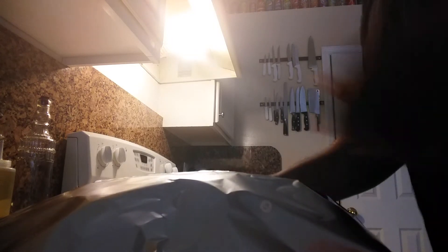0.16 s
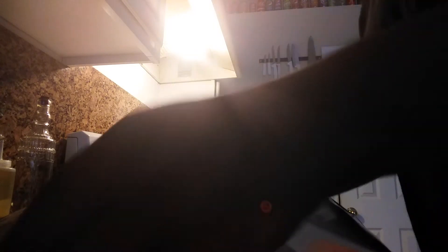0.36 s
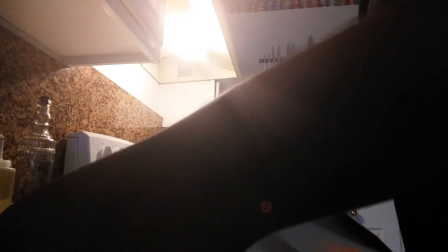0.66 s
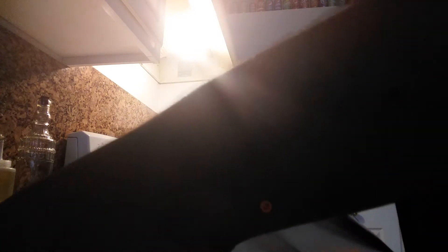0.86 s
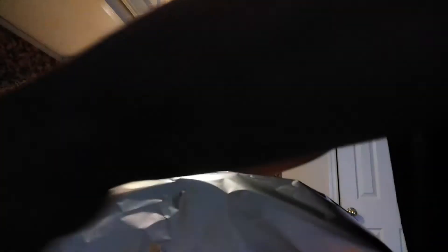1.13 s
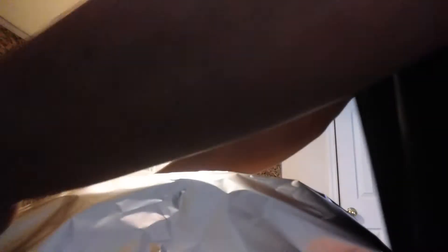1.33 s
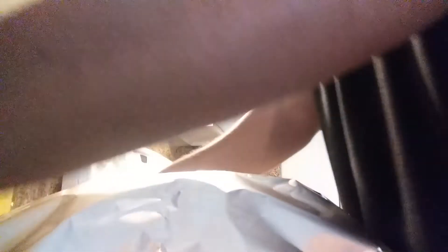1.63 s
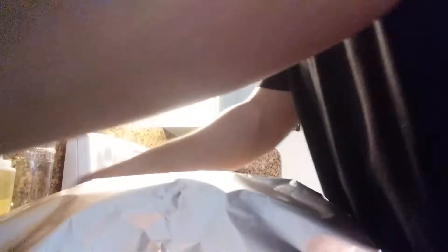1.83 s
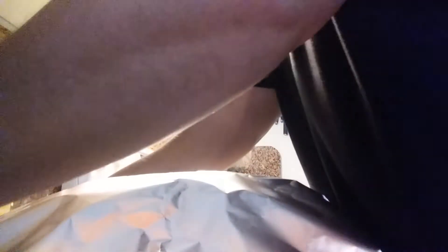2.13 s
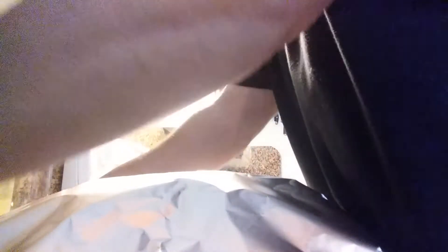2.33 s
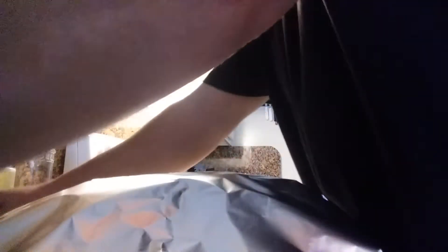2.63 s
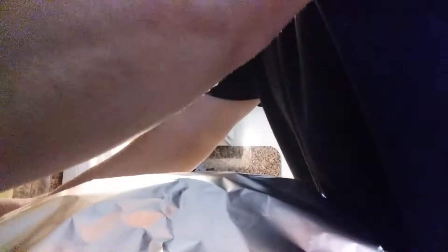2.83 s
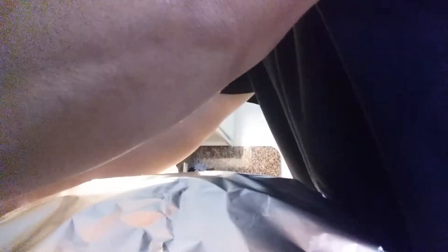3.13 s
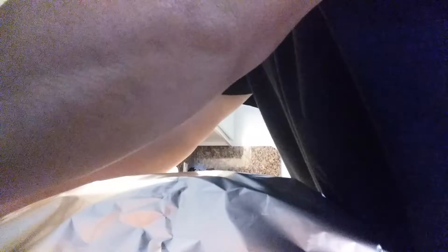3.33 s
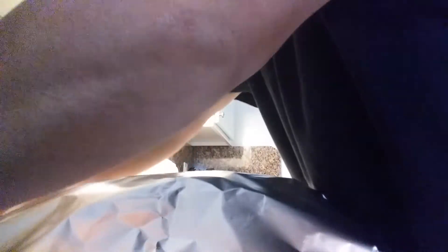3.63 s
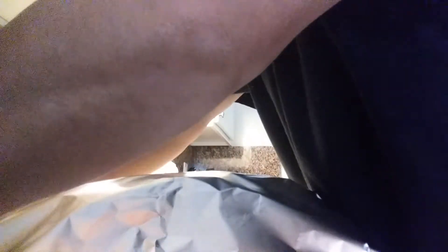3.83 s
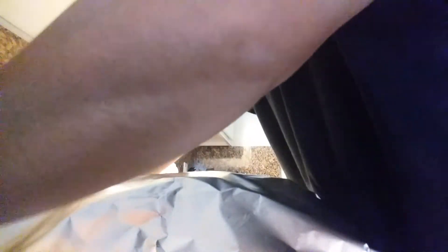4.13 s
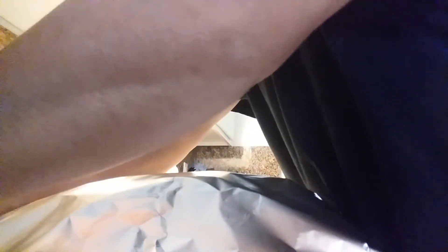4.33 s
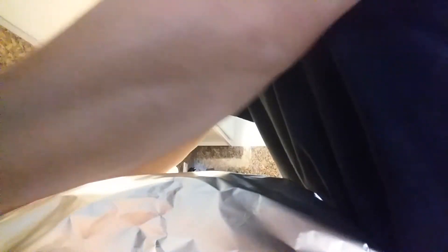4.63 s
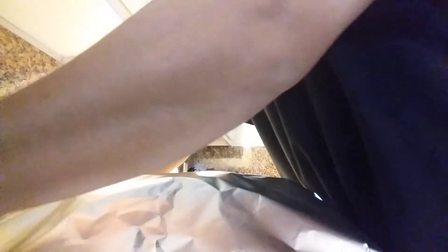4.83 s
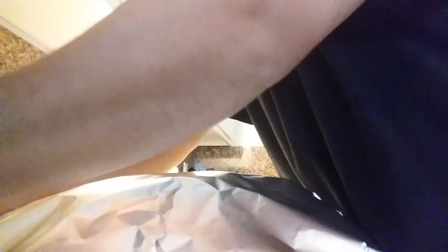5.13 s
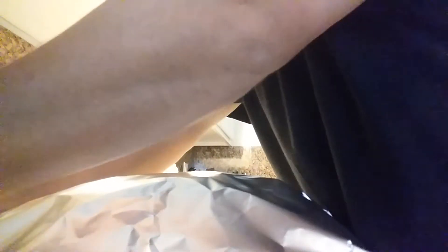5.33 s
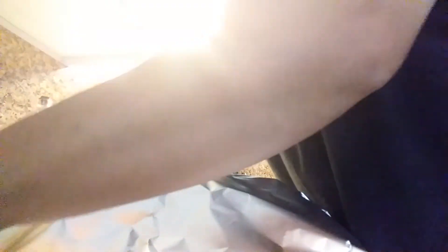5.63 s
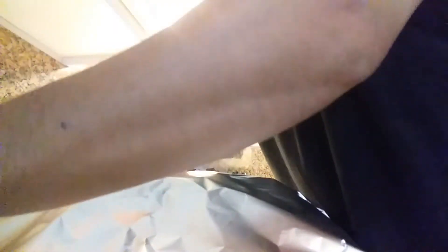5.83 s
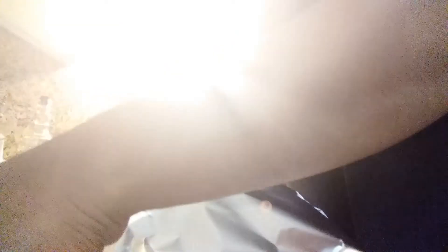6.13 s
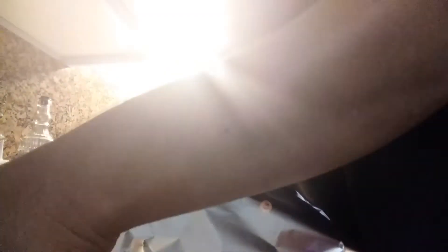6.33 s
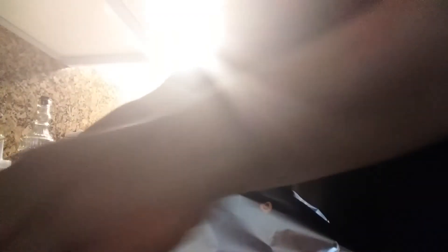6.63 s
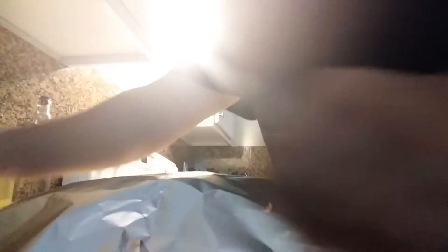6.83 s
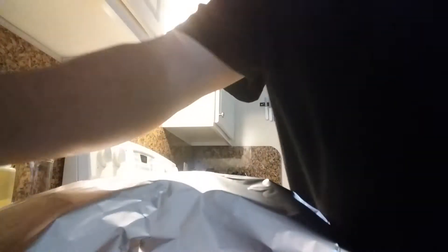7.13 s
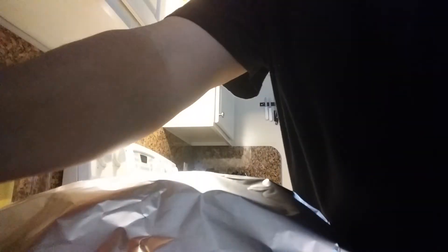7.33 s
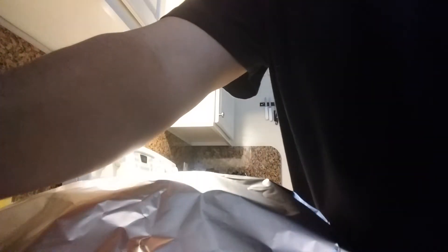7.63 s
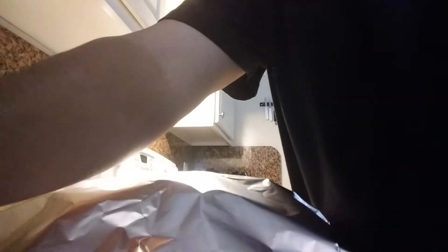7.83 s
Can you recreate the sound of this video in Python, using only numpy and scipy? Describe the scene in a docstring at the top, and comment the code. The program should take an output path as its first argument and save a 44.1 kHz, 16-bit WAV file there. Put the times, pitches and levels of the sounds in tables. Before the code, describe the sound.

Close, busy crumpling of kitchen foil, with sharp creases, fine crackle and sliding rustle, fading after seven seconds to near silence with soft knocks.

```python
"""Hands press and fold aluminium foil over a pan, close to a single microphone in a small kitchen.
From the start, creases snap through one by one as bursts of noise that shake the sheet's dense modes; between
them small creases crackle over the rustle of sliding foil, filtered noise that sings on a few notes. The pan
rings along as a bank of resonances. Tiny kinks tick and short rough notes sound until the work fades. Dull
thuds, low modes driven by noise, jolt under early creases and return at the end. A faint hum runs throughout."""
import sys
import numpy as np
from scipy import signal
from scipy.fft import rfft, irfft, next_fast_len
from scipy.io import wavfile

SR = 44100
rng = np.random.default_rng(int(sys.argv[2]) if len(sys.argv) > 2 else 0)


def file_out(sig):
    """Save sig as 16-bit WAV at sys.argv[1]."""
    # one column per channel
    cols = np.atleast_2d(sig).T
    # limit, then scale
    lim = np.clip(cols, -1, 1)
    pcm = np.round(lim * 32767).astype(np.int16)
    wavfile.write(sys.argv[1], SR, pcm)


N = 351477
GRAIN = 4096   # unit of crease length [samples]
BASS_HZ, MIDDLE_HZ, TREBLE_HZ = 401, 2986, 11900   # where the colour weights act


def from_db(db):
    """Decibel definition: amplitude ratio of a level."""
    return 10 ** (np.asarray(db) / 20)


def rms_one(x):
    """Normalisation to unit effective value."""
    return x / np.sqrt(np.mean(x ** 2) + 1e-20)


def at_hz(points, hz):
    """Interpolation of a (frequency [Hz], value) table on a logarithmic frequency axis."""
    table_hz, values = np.array(points).T
    return np.interp(np.log(hz + 1), np.log(table_hz), values)


def colour(x, spectrum):
    """Linear filtering: the spectrum of the last axis is multiplied by a gain curve."""
    size = x.shape[-1]
    gain = from_db(at_hz(spectrum, np.fft.rfftfreq(size, 1 / SR)))
    return irfft(rfft(x) * gain, size)


def three_ways(x):
    """Complementary band splitting: bass, middle and treble shares add up to the whole."""
    size = x.shape[-1]
    hz = np.fft.rfftfreq(size, 1 / SR)
    shares = [at_hz(np.c_[[BASS_HZ, MIDDLE_HZ, TREBLE_HZ], row], hz) for row in np.eye(3)]
    return [irfft(rfft(x) * share, size) for share in shares]


def drift(rate_hz):
    """Low-pass filtered noise: slow chance with spread 1."""
    r = np.exp(-2 * np.pi * rate_hz / SR)
    slow = signal.lfilter([1], [1, -2 * r, r * r], rng.standard_normal(N + SR))
    return rms_one(slow[SR:])   # the filter has settled after one second


def resonate(x, hz, width_hz):
    """Simple resonance: a two-pole filter with gain 1 on top."""
    r = np.exp(-np.pi * width_hz / SR)
    poles = [1, -2 * r * np.cos(2 * np.pi * hz / SR), r * r]
    return signal.lfilter([(1 - r * r) / 2, 0, (r * r - 1) / 2], poles, x)


def hum():
    """Narrow-band noise wavers in level: a faint low hum, probably an appliance."""
    narrow = resonate(rng.standard_normal(N), 123, 36)
    return from_db(-67.5) * rms_one(resonate(narrow, 123, 90))


# decay times of the room's bass, middle and treble: (t60 [s])
ROOM_DECAY = [0.21, 0.19, 0.098]


def kitchen(x):
    """Diffuse reverberation: convolution with noise that builds up softly and whose bass dies slowest."""
    t = np.arange(SR // 2) / SR
    parts = three_ways(rng.standard_normal(len(t)))
    tail = sum(part * from_db(-60 * t / t60) for part, t60 in zip(parts, ROOM_DECAY))
    tail *= 1 - np.exp(-t / 0.024)
    return signal.fftconvolve(x, tail / np.linalg.norm(tail))[:N]


# dull low thuds, at first bass jolts under loud creases, later soft knocks or a step:
# (time [s], relative level [dB], extra share of all modes but the lowest [dB])
THUD_TIMES = [(0.38, -29, -17), (1.69, -39, -17), (1.741, -34, -17), (7.464, -37, -17), (7.496, -38, -2),
              (7.522, -41, 8), (7.535, -46, 6.5), (7.557, -51, 9), (7.578, -45, 3), (7.721, -55, 6),
              (7.875, -59, 10)]
# low modes that every thud excites: (frequency [Hz], relative level [dB], t60 [s])
LOW_MODES = [(115, 5.5, 0.035), (328, -13, 0.065), (556, -17, 0.099), (740, -1, 0.028), (815, -5.5, 0.033),
             (1360, -8.5, 0.017)]


def thuds():
    """Modal excitation: short bursts of noise set the same low modes ringing."""
    s, level_db, high_db = np.transpose(THUD_TIMES)
    size = SR // 20
    burst = np.hanning(size) ** .5 * np.exp(-np.arange(size) / (0.021 * SR))
    out = np.zeros(N)
    for k, (hz, mode_db, t60) in enumerate(LOW_MODES):
        push = np.zeros(N)
        push[(s * SR).astype(int)] = from_db(level_db + mode_db - 22 + (k > 0) * high_db)
        push = signal.fftconvolve(push, burst)[:N] * rng.standard_normal(N)
        r, w = from_db(-60 / (t60 * SR)), 2 * np.pi * hz / SR
        out += signal.lfilter([0, np.sin(w)], [1, -2 * r * np.cos(w), r * r], push)
    # little deep bass
    return signal.sosfilt(signal.butter(2, 75, "high", fs=SR, output="sos"), out)


STIR_DB, STIR_BEFORE_S, STIR_AFTER_S = -19.5, 0.045, 0.068   # amplitude time constants


def stir():
    """Exponential growth and decay: power of the unrest before and after each loud crease."""
    s, level_db = np.transpose(LOUD_CREASES)[:2]
    kicks = np.full(N, 1e-18)
    kicks[(s * SR).astype(int)] = from_db(2 * (level_db + STIR_DB))
    before, after = np.exp(-2 / (SR * np.array([STIR_BEFORE_S, STIR_AFTER_S])))
    outlasting = signal.lfilter([1], [1, -after], kicks)
    leading_up = signal.lfilter([0, before], [1, -before], kicks[::-1])[::-1]
    return outlasting + leading_up


# slow course of the hands' work: (time [s], relative level [dB])
HAND_WORK = [(0.02, -70), (0.05, -31.5), (0.36, -42.5), (0.45, -29.5), (1.1, -36.5), (1.4, -33),
             (1.82, -39.5), (2.31, -36), (2.7, -29), (2.93, -45), (3.69, -44.5), (4.05, -41), (4.3, -48),
             (4.67, -38.5), (5.1, -43.5), (5.86, -37.5), (5.94, -46), (6.5, -35), (6.875, -51),
             (6.885, -39.5), (7.17, -40.5), (7.42, -51.5), (7.46, -56.5), (7.57, -48.5), (7.69, -59.5),
             (7.76, -61), (7.8, -68), (7.97, -71.5)]
# manner of handling: (time [s], bass weight [dB], strength of the crackle over the rustle [dB])
HANDLING = [(0, 6.5, 3), (0.5, 5.5, -10), (1.4, 5.5, -1.5), (1.75, 5.5, -0.5), (2.399, 3, -5.5),
            (3.2, 4.5, 2), (4.9, 4, 0.5), (5.499, 10, 3.5), (6.2, 7, -5.5), (6.8, 11.5, 3), (6.9, 6, -6.5),
            (7.97, 4, -9)]


def at_time(s):
    """Addition of powers, slow work plus stir: level, bass weight and crackle strength at given times."""
    work_s, work_db = np.transpose(HAND_WORK)
    manner_s, bass_db, strength_db = np.transpose(HANDLING)
    work_power = from_db(2 * np.interp(s, work_s, work_db))
    level_db = 10 * np.log10(work_power + stir()[(s * SR).astype(int)])
    return level_db, np.interp(s, manner_s, bass_db), np.interp(s, manner_s, strength_db)


# spectrum of foil, pan and microphone together: (frequency [Hz], relative spectral density [dB per Hz])
SHEET_SPECTRUM = [(24, -48.5), (40, -27.5), (69, -10), (262, -14.5), (570, -7.5), (918, -3), (1410, -3.5),
                  (1590, -7), (3380, -2), (8130, -8), (9220, -6.5), (11300, -17.5), (14800, -15),
                  (16000, -11)]


def rustle():
    """Friction noise: foil slides under the palms, the less steady the stronger the crackle."""
    level_db, bass_db, strength_db = at_time(np.arange(N) / SR)
    noise = rms_one(colour(rng.standard_normal(next_fast_len(N)), SHEET_SPECTRUM))
    bass, middle, treble = (part[:N] for part in three_ways(noise))
    unsteady_db = 2.6 * from_db(strength_db) * drift(23)
    return from_db(level_db - 7.5 + unsteady_db) * (from_db(bass_db) * bass + middle + treble)


# notes of the taut foil: (frequency [Hz])
SINGING_NOTES = [570, 1010, 1320, 1970, 6600, 7150]
SINGING_WIDTH_SHARE = 0.031   # bandwidth as a share of the frequency


def singing(sliding):
    """Resonance under friction: taut foil sings on a few notes, clearer where the crackle is weaker."""
    strength_db = at_time(np.arange(N) / SR)[2]
    smooth = from_db(-9.5 - 1.1 * strength_db) * sliding
    return sum(resonate(smooth, hz, SINGING_WIDTH_SHARE * hz) for hz in SINGING_NOTES)


# resonances of the covered pan: (frequency [Hz], width [Hz], gain [dB])
PAN_MODES = [(209, 27, -6), (334, 42, -5), (573, 120, -5.5), (1425, 140, -8.5), (1850, 310, -9)]


def pan(foil):
    """Sympathetic resonance: the covered pan rings along with the foil."""
    return sum(from_db(gain_db) * resonate(foil, hz, width_hz) for hz, width_hz, gain_db in PAN_MODES)


# short rough notes, the two low ones near 4.5 s from a rub: (time [s], relative level [dB], frequency [Hz])
ROUGH_NOTES = [(0.509, -19, 1440), (0.609, -15, 1640), (0.878, -18, 1050), (1.358, -14, 1280),
               (2.123, -17.5, 834), (3.05, -25.5, 910), (3.106, -28, 890), (3.345, -25.5, 915),
               (4.445, -39.5, 210), (4.521, -41, 223), (4.937, -21, 1400), (5.832, -30, 660),
               (6.389, -16.5, 1360), (6.89, -29, 1070)]
NOTE_T60_CYCLES, NOTE_DB = 51, -4.5   # decay time in cycles of the note, level shift


def rough_notes():
    """Damped resonance: noise in a narrow band gives a short rough note that dies within a few dozen cycles."""
    size = 2 * GRAIN
    out, t = np.zeros(N + size), np.arange(size) / SR
    for (s, level_db, hz), noise in zip(ROUGH_NOTES, rng.standard_normal((len(ROUGH_NOTES), size))):
        note = rms_one(resonate(noise, hz, 0.075 * hz))
        decay_db = -60 * t * hz / NOTE_T60_CYCLES
        start = int(s * SR)
        out[start:start + size] += from_db(level_db + NOTE_DB + decay_db) * note
    return out[:N]


def creases(times, level_db, bass_db, treble_db, rise_ms, t60_ms, size, facet_db, rough):
    """Excitation of dense modes: noise swells while the fold runs on, then dies; a few facets sound louder."""
    ms, hz = 1000 * np.arange(size) / SR, np.fft.rfftfreq(size, 1 / SR) + 1
    rise_ms, t60_ms = rise_ms[:, None], t60_ms[:, None]
    luck = rng.standard_normal((len(times), 2, size))
    # the fold advances in sharp jerks
    stutter = signal.lfilter([1], [1, -.975], np.clip(luck[:, 1] - 2.5, 0, .4))

    octave = np.log2(hz / MIDDLE_HZ)
    down = at_hz([(60, .3), (BASS_HZ, 1), (MIDDLE_HZ, 0)], hz)   # the deepest bass follows only in part
    up = np.clip(octave / np.log2(TREBLE_HZ / MIDDLE_HZ), 0, 1)
    tint_db = at_hz(SHEET_SPECTRUM, hz) + np.outer(bass_db, down) + np.outer(treble_db, up)
    for facet in rng.uniform(np.log2(900 / MIDDLE_HZ), 2.175, (len(times), 5)).T:
        tint_db += facet_db * np.exp(-((octave - facet[:, None]) / 0.51) ** 2)

    shake = irfft(rfft(luck[:, 0]) * from_db(tint_db), size)
    shake *= (from_db(level_db) / shake.std(axis=1))[:, None] * (1 + rough * stutter)
    # it sets in with a jolt, then grows
    shake *= np.minimum(0.29 / (1 + rise_ms / 25) + 0.31 * ms / rise_ms, 1)
    shake *= from_db(-60 * np.maximum(ms - rise_ms, 0) / t60_ms)
    # a sudden crease starts with a sharp crack
    shake *= 1 + 1.54 / (1 + rise_ms) * np.exp(-ms / 0.63)
    out = np.zeros(N + size)
    for start, grain in zip((times * SR).astype(int), shake):
        out[start:start + size] += grain
    return out[:N]


# tiny kinks that flip over: (time [s], relative level [dB])
KINKS = [(0.38, 1.5), (0.978, -15.5), (1.3101, -9), (1.3467, -12), (1.3514, -9.5), (1.3738, -14),
         (1.3857, -12), (1.6139, -17), (2.0951, -14), (2.3396, -17), (2.3577, -12), (2.7835, -19),
         (3.5843, -18), (3.65, -20), (4.0512, -20.5), (4.4577, -14.5), (4.9374, -17.5), (5.1086, -25.5),
         (5.5536, -18), (5.668, -25.5), (6.053, -12.5)]
TICK_RISE_MS, TICK_T60_MS, TICK_DB = 0.16, 16, -9


def ticks():
    """Impulsive excitation: each kink flips over with a dry tick, a very short, thin crease."""
    s, level_db = np.transpose(KINKS)
    same = np.ones(len(s))
    return creases(s, level_db + TICK_DB, -8 * same, 0 * same, TICK_RISE_MS * same, TICK_T60_MS * same,
                   size=GRAIN // 4, facet_db=5.5, rough=0)


def crackle():
    """Clustered random process: small creases in clumps, many faint and few strong, each with its own colour."""
    clumps = from_db(4 * drift(15))
    s = np.flatnonzero(rng.random(N) < 330 * clumps / SR) / SR   # 330 per second where clumps is 1
    luck = rng.standard_normal((len(s), 4))
    strong_db = 3.46 * np.minimum(rng.exponential(1, len(s)), 4)
    level_db, bass_db, strength_db = at_time(s)
    rise_ms, t60_ms = 0.38 * from_db(2.6 * luck[:, 3]), 14 * from_db(7.0 * luck[:, 2])
    return creases(s, level_db + strength_db - 9.0 + strong_db, bass_db + 6 * luck[:, 0], 6 * luck[:, 1],
                   rise_ms, t60_ms, size=GRAIN // 4, facet_db=8.5, rough=0)


# loud creases: (time [s], level before the swell [dB], brightness [dB], rise before decay [ms], t60 [ms])
LOUD_CREASES = [(0.028, -30, -10, 4.8, 510), (0.099, -27.5, -19, 3.3, 200), (0.206, -29.5, -8.5, 1.4, 63),
                (0.276, -29, -7.5, 1.6, 90), (0.37, -13, -7, 9, 144), (0.529, -15, -7.5, 0.55, 73),
                (0.564, -25, -5, 0.26, 200), (0.606, -25, -4.5, 1.9, 17), (0.631, -17.5, -4.5, 7.7, 130),
                (0.689, -17, -12.5, 13.4, 79), (0.73, -16, -5.5, 11.5, 81), (0.766, -18, -12, 0.35, 51),
                (0.783, -20, -10, 2.2, 144), (0.864, -17, -7, 3, 84), (0.929, -23, -2.5, 4.5, 36),
                (0.976, -23.5, -10.5, 24, 110), (1.212, -21.5, -13, 31, 160), (1.27, -17.5, -8, 8.8, 137),
                (1.347, -26, -7.5, 4.5, 100), (1.413, -18, -7, 0.3, 35), (1.683, -24.5, -9.5, 0.23, 140),
                (1.727, -26.5, -10, 14, 86), (1.872, -34, -19.5, 2.2, 300), (1.898, -26.5, -1.5, 0.66, 154),
                (1.952, -25.5, -1.5, 0.21, 150), (2.016, -17.5, -4.5, 9.3, 110),
                (2.066, -21.5, -9, 0.59, 37), (2.095, -17, -2.5, 34.4, 41), (2.168, -12, 0, 0.44, 29),
                (2.208, -26.5, 4, 0.54, 71), (2.278, -27.5, 15, 0.29, 35), (2.364, -22, -9.5, 0.43, 195),
                (2.387, -13, -7.5, 1.6, 35), (2.448, -27, -3, 0.68, 45), (2.607, -28, 8, 0.76, 35),
                (2.686, -22, -5.5, 4.4, 64), (2.832, -27, -7.5, 0.25, 62), (2.88, -23, 2.5, 11, 14),
                (2.962, -29.5, -5.5, 5.6, 170), (3.014, -26, -8, 21, 88), (3.129, -23.5, -7.5, 0.98, 66),
                (3.158, -12.5, -8, 35.5, 36), (3.201, -11.5, 0, 3, 93), (3.255, -10.5, -2.5, 2.6, 9.5),
                (3.27, -30, -1.5, 0.5, 90), (3.431, -25, 9.5, 3.9, 13), (3.486, -31.5, -13, 1.4, 100),
                (3.515, -25.5, -6.5, 23, 31), (3.57, -28.5, -7, 4.7, 360), (3.677, -25.5, -5, 2, 67),
                (3.834, -19.5, 1, 2.1, 35), (3.854, -14.5, -5.5, 2.1, 27), (4.03, -27, -7, 47, 32),
                (4.193, -33, -6.5, 3.9, 180), (4.23, -33.5, -10.5, 1.9, 61), (4.295, -40.5, -13, 0.5, 63),
                (4.35, -39, -4.5, 1.8, 350), (4.433, -28, -10, 5.5, 47), (4.452, -24.5, -10, 6.3, 70),
                (4.571, -31.5, -1.5, 0.95, 230), (4.632, -24, -9, 9.6, 91), (4.749, -32.5, -5, 5.6, 180),
                (4.806, -24.5, -10, 5.5, 90), (4.851, -19.5, -2.5, 0.57, 14), (4.9, -20.5, 1.3, 6.3, 78),
                (4.929, -22.5, -2.5, 9.3, 81), (5.17, -24, -14, 37, 410), (5.301, -16.5, -11.5, 8, 107),
                (5.385, -20, -3, 5.7, 145), (5.481, -23, -22, 0.42, 37), (5.565, -21.5, -14.5, 54, 110),
                (5.609, -20.5, -8, 6.8, 54), (5.711, -32.5, -19, 2.84, 79), (5.805, -27, -11.5, 8.1, 75),
                (5.833, -29, -20.5, 0.73, 240), (5.965, -32.5, -12.5, 0.7, 64),
                (5.997, -30.5, -16, 0.77, 79), (6.029, -20.5, -7.5, 24, 82), (6.07, -17.5, -0.5, 2.2, 90),
                (6.133, -17, -5, 14, 183), (6.167, -13, -2.5, 4.7, 51), (6.389, -26, -6, 1.1, 80),
                (6.433, -24.5, -8.5, 0.38, 260), (6.482, -16.5, -7.5, 0.67, 61),
                (6.567, -31.5, -9, 0.85, 350), (6.651, -26, -13.5, 2.6, 102), (6.88, -39, -11, 0.52, 250),
                (7.724, -57, -11, 0.62, 47)]
BASS_PER_TREBLE, BASS_PER_MANNER = -0.9, 0.61   # bright creases are thin; heavy handling is deep


def snaps():
    """Sudden buckling: the loud creases, with bass and treble weights counted from an average crease."""
    s, level_db, treble_db, rise_ms, t60_ms = np.transpose(LOUD_CREASES)
    bass_db = BASS_PER_TREBLE * treble_db + BASS_PER_MANNER * at_time(s)[1]
    return creases(s, level_db, bass_db - bass_db.mean(), treble_db - treble_db.mean(),
                   np.maximum(rise_ms, .2), np.maximum(t60_ms, 5), size=2 * GRAIN, facet_db=2.0, rough=3.17)


def scene():
    """Superposition: all sources add up at one microphone, which feeds both channels."""
    sliding = rustle()
    foil = sliding + rough_notes() + ticks() + crackle() + snaps()
    near = thuds() + singing(sliding) + pan(foil) + foil
    return np.tile(hum() + from_db(-13.5) * kitchen(near) + near, (2, 1))


def record(dry):
    """Transducer limits: faint hiss, soft saturation of the highest peaks, and a band cut at both ends."""
    dry = dry + from_db(-82.5) * rng.standard_normal(N)
    dry = 0.9 * np.tanh(dry / 0.9)
    dry = signal.sosfilt(signal.butter(4, 50, "high", fs=SR, output="sos"), dry)
    # 70 dB down from 16600 Hz upwards
    return signal.sosfilt(signal.cheby2(14, 70, 16600, fs=SR, output="sos"), dry)


dry = scene()
out = record(dry)
file_out(out)
```